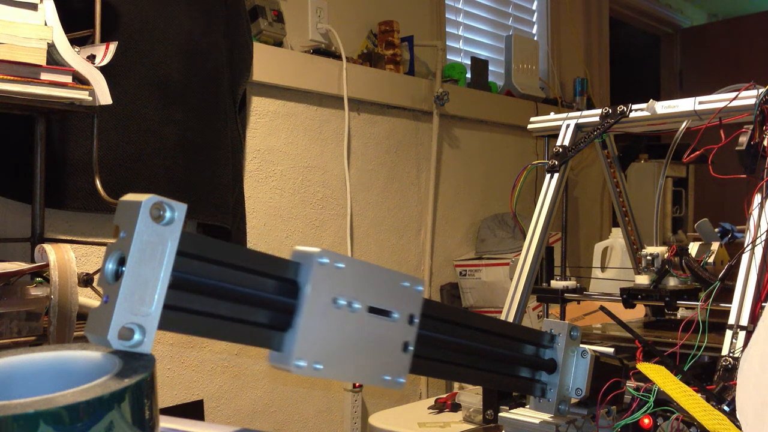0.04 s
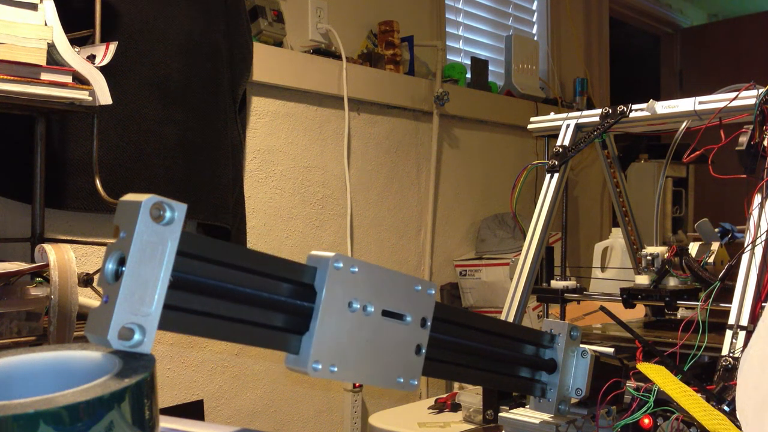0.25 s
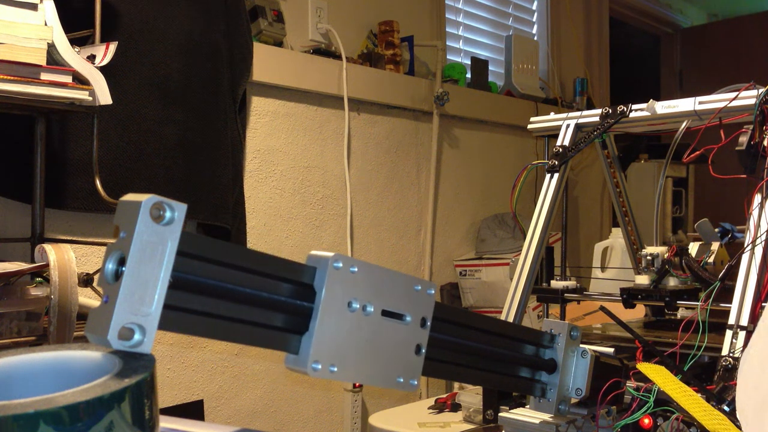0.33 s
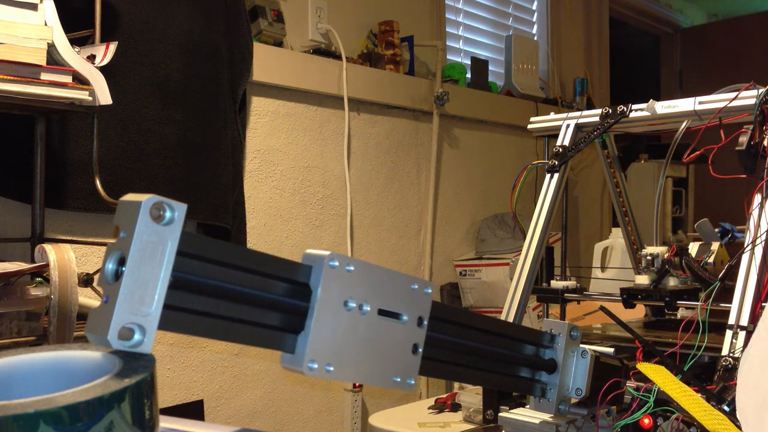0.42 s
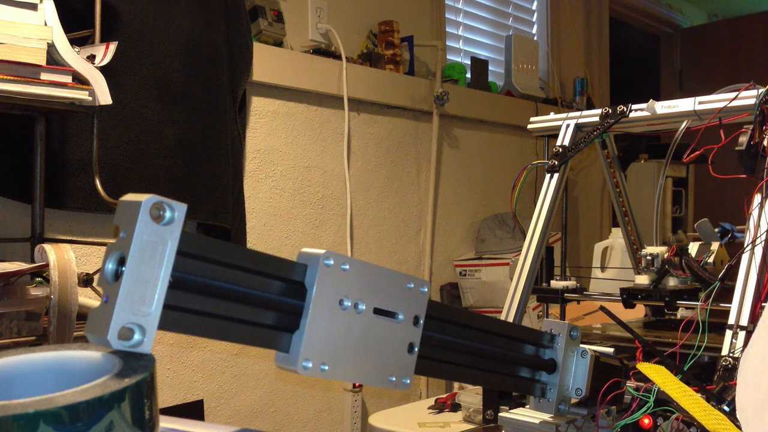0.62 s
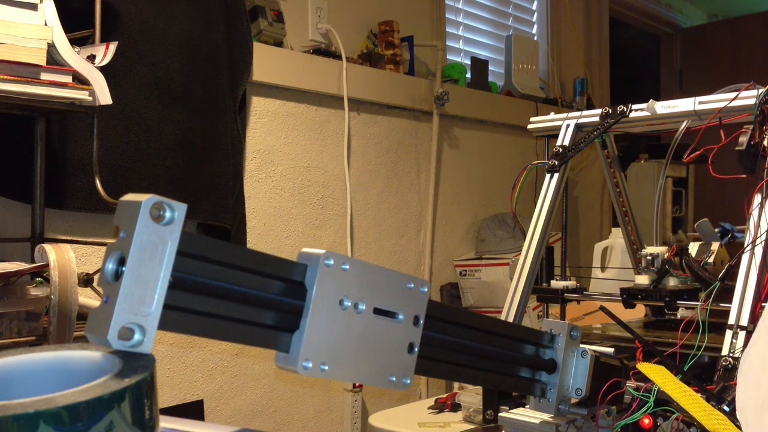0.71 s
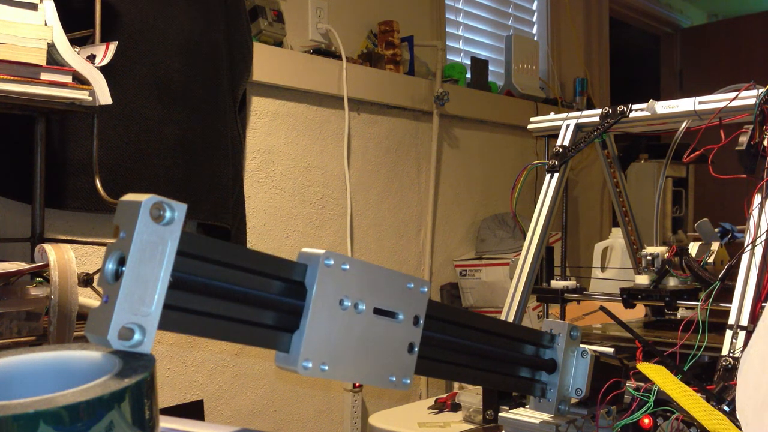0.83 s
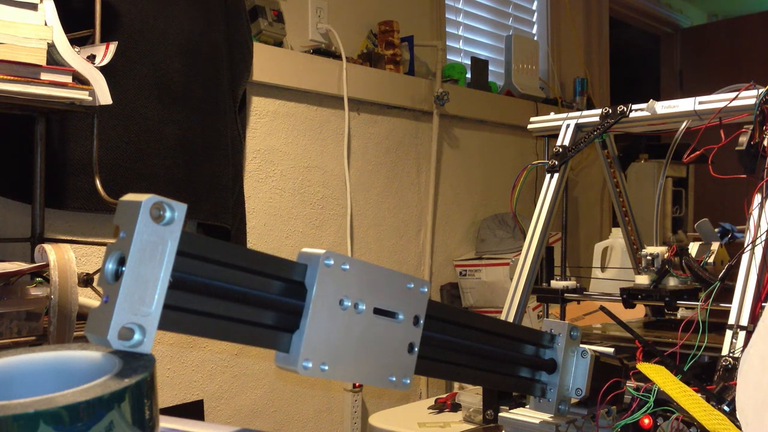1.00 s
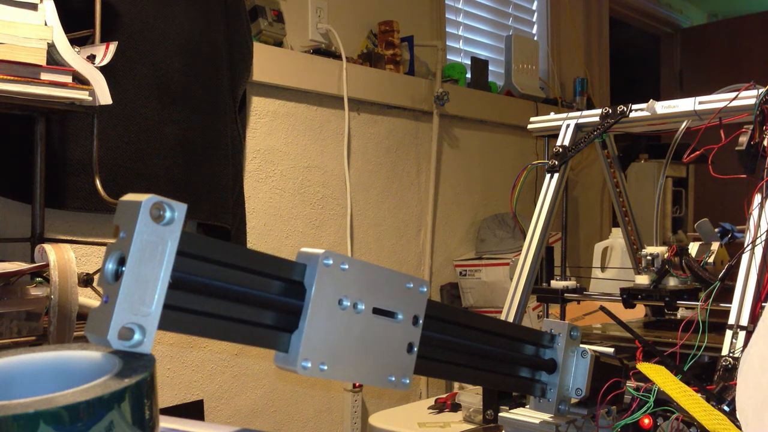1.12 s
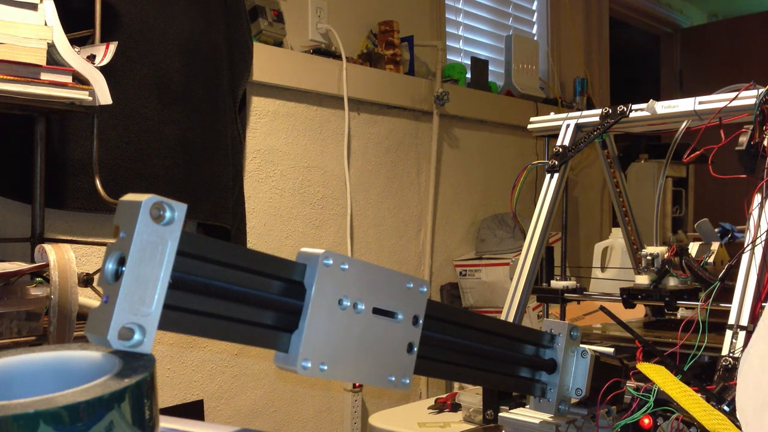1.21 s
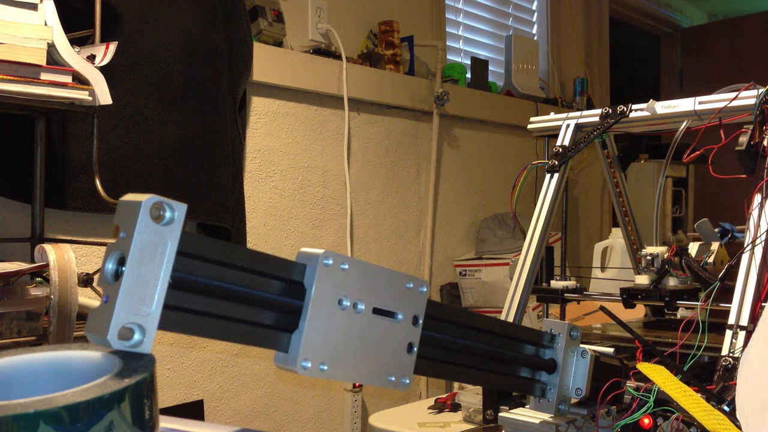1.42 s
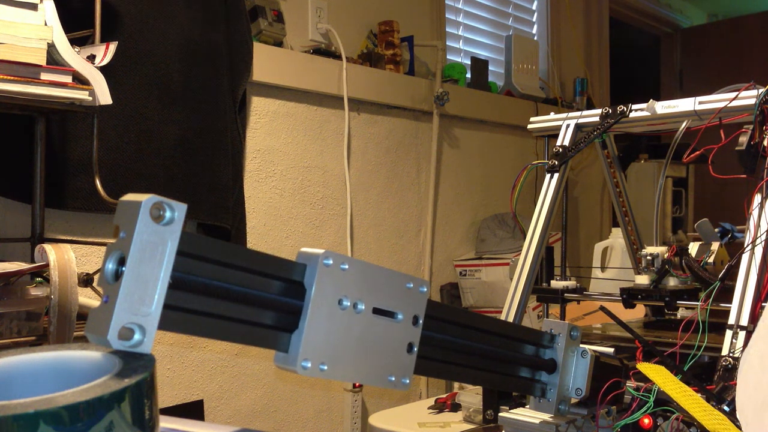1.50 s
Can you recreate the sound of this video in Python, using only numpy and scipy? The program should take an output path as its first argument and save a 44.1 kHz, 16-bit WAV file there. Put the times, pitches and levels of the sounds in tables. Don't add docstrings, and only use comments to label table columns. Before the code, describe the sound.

A stepper motor whine starts high and slides steeply down over the first 0.35 seconds, with faint screw hiss and scraping. From about 0.23 to 0.35 the carriage rattles brightly; sharp knocks, ringing chatter and low bench thuds cluster at 0.39-0.5, thinning by 0.63. Quiet hum, room hiss and a very faint high whistle follow. A soft, dull jolt lands around 1.1, then quiet. Close, dry, small room.

```python
import sys
import numpy as np
from scipy import signal
from scipy.fft import rfft, irfft
from scipy.io import wavfile
from scipy.ndimage import uniform_filter1d

SR = 44100
rng = np.random.default_rng(int(sys.argv[2]) if len(sys.argv) > 2 else 0)


def amplitude_ratio(level_db):
    exponent = np.asarray(level_db, float) / 20
    return 10 ** exponent


def master(y):
    cut = np.clip(np.atleast_2d(y).T, -1, 1)
    pcm = np.round(cut * 32767)
    wavfile.write(sys.argv[1], SR, pcm.astype(np.int16))


N = 68355
T = np.arange(N) / SR

# time_s, step_rate_hz, level_db
STEPS = [(0, 1368, -49.5), (.014, 1330, -60.5), (.044, 1220, -47.5), (.074, 1127, -52), (.087, 1079, -45),
         (.1, 1032, -54.5), (.113, 988, -75), (.14, 874.4, -47), (.16, 807.2, -54.5), (.188, 707, -52),
         (.22, 577.5, -41), (.236, 516.3, -39.5), (.252, 470.6, -41), (.276, 401.2, -47), (.3, 284, -56),
         (.311, 246.4, -60), (.331, 190.6, -50), (.379, 100, -82)]
# step_rate_multiple, level_db
WHINE_ORDERS = [(.5, -51), (1.5, -61.5), (2, -59), (2.5, -58)]
# freq_hz, gain_db
FRAME_RESPONSE = [(400, -13.5), (490, -15), (530, 5.5), (580, -17.5), (720, -11), (1300, -24), (1620, 3.5),
                  (2250, -10.5)]
# freq_hz, density_db_per_hz
RUSH_COLOUR = [(1200, -25), (2400, -6), (3300, -4), (5000, -14), (10000, -20), (14000, -31)]
# time_s, level_db
SLIDE_EFFORT = [(0, -57), (0.099, -55), (.2, -54.5), (.35, -47.5), (.42, -47.5), (0.6, -49.5), (0.649, -61),
                (.69, -100.5)]
# freq_hz, density_db_per_hz
SLIDE_COLOUR = [(90, -37), (160, 1.5), (450, -5), (1000, -11.5), (1800, -6.5), (3300, -15), (5000, -30.5),
                (10000, -44)]
# freq_hz, level_db
HUM_PARTIALS = [(119.5, -71), (239, -76.5), (359, -76.5), (480, -81), (601, -85), (5410, -87.5)]
# freq_hz, density_db_per_hz
ROOM_COLOUR = [(18, -47.5), (30, -48), (119, -8), (380, -16.5), (464, -20.5), (1300, -29), (2200, -26),
               (11500, -33), (15300, -33)]
# peak_s, level_db, pitch_hz, length_s,
# glide_hz_per_s
RINGS = [(0.068, -58.5, 2270, 0.019, -6000), (0.182, -50.5, 1624, 0.022, -300),
         (.271, -28.5, 2008, .005, -6000), (.312, -25.5, 1963, 0.0056, -1500),
         (0.332, -31.5, 2010, .008, -500), (0.3033, -41, 3540, 0.0007, -900),
         (0.307, -33.5, 3570, 0.00097, -900), (.3107, -31, 3600, 0.00077, -900),
         (0.3166, -28, 3600, 0.0011, -900), (.3197, -32, 3650, 0.00072, -900),
         (0.313, -44.5, 697, 0.019, -4000), (.394, -35.5, 1800, 0.001, -90000),
         (0.397, -44, 3500, .0012, -900), (0.4309, -35, 1800, 0.0014, -100000),
         (0.4334, -43.5, 3100, 0.0014, -900), (0.438, -36.5, 1810, 0.0021, -20000),
         (.447, -40.5, 1426, 0.0037, 5000), (.4525, -37, 1932, 0.0028, 30000),
         (0.4574, -27, 2100, 0.0025, 3000), (.458, -39, 3830, .0015, -900),
         (0.467, -30, 2130, 0.0019, -500), (0.47, -35.5, 2105, 0.012, -500),
         (0.491, -44, 2056, 0.013, -500), (0.5242, -36.5, 2020, 0.0018, -4000),
         (.530, -33.5, 1840, 0.0024, -4000), (0.546, -46.5, 414, 0.0086, -11000),
         (0.564, -51.5, 605, 0.0063, 3000), (.577, -40, 1780, 0.0027, -9000),
         (0.582, -42, 1596, 0.0055, -1500), (0.612, -42, 1970, .002, -900)]
# start_s, level_db, pitch_hz, rise_s, t60_s
THUDS = [(0.073, -61, 193, 0.013, 0.15), (0.152, -49, 157, 0.016, 0.18), (0.186, -59, 159, 0.0099, 0.11),
         (0.326, -37.5, 366.5, 0.0022, 0.038), (0.346, -39.5, 182.6, 0.0035, .1),
         (0.371, -44, 174.2, 0.0058, 0.13), (0.388, -48.5, 288, 0.0027, 0.084),
         (0.429, -38.5, 362, 0.0026, 0.044), (0.447, -38.5, 227, 0.002, 0.086),
         (.48, -38, 354, 0.0017, 0.036), (0.504, -45.5, 248, 0.0045, 0.052),
         (0.603, -36.5, 174, 0.0031, 0.092), (.625, -51.5, 342.5, 0.0036, 0.09),
         (0.641, -51.5, 164, 0.0066, 0.11), (.885, -55, 198, 0.006, 0.087), (0.952, -60, 186, 0.0067, 0.14),
         (1.110, -40.5, 163, 0.0042, 0.085), (1.159, -47, 167, 0.0037, 0.088),
         (1.195, -56, 219, 0.0014, 0.03)]
# peak_s, level_db, length_s, low_modes_db, high_modes_db
BURSTS = [(0.216, -45.5, 0.0095, -1, -8), (0.23, -39, 0.0071, 7.5, -18), (0.236, -30, 0.0066, 2, 5),
          (0.252, -37.5, 0.0046, 6, 8.5), (0.265, -33, 0.0069, -1, 3.5), (0.294, -45, 0.0057, -4, -2),
          (0.3, -49, 0.0035, -4, -7), (0.31, -27.5, 0.0075, 0, -2.5), (0.319, -30, 0.0044, 0.5, -4.5),
          (0.327, -39, 0.0083, -2, 1.5), (0.344, -43, 0.0044, -21.5, -10.5), (0.447, -34, 0.0055, 8.5, 1),
          (0.456, -25.5, 0.0052, -8, -1), (0.4673, -34, 0.0039, -14, -8), (0.481, -42, 0.013, -23, -1),
          (0.523, -37, 0.011, 0.5, -5.5), (0.542, -58, 0.0067, 1, -14), (0.583, -45, 0.0089, 6, -1.5),
          (0.608, -44.5, 0.0055, 0, -5.5), (0.622, -59, 0.0095, -12, 3), (1.121, -60, 0.0046, -4.5, 0),
          (1.15, -59.5, 0.019, 0, -1)]
# start_s, level_db, fall_s, low_modes_db, high_modes_db
KNOCKS = [
    (.3920, -28, 0.00095, 0, -5.5),
    (0.4299, -28, 0.0033, 2.5, -12),
    (0.4367, -30, 0.0022, -2, -4),
    (0.4393, -33.5, 0.0012, 0, 5.5),
    (1.07, -56, .004, 5, -3.5),
    (1.079, -58, 0.0038, 8, 3),
    (1.097, -43.5, 0.016, 4.5, -18),
    (1.135, -42, 0.0062, -0.5, -16),
]
# freq_hz, width_hz, gain_db
LOW_MODES = [(720, 140, -10.5), (1160, 81, -9), (1441, 178, -3), (1600, 245, -3.5)]
MID_MODES = [(2017, 101, 2), (2158, 62, -5), (2186, 148, -7.5), (2408, 37, -11.5)]
HIGH_MODES = [(2827, 71, -9.5), (3050, 267, -7), (3296, 102, -4.5), (3605, 184, -10.5), (3930, 228, -13),
              (5200, 3500, -38.5)]
# start_s, level_db, pitch_hz, fall_s
TAPS = [(0.232, -50, 4660, 0.017), (.231, -60.5, 7650, 0.0052), (.306, -56, 7800, 0.013),
        (.306, -53, 4500, 0.014), (0.45, -31, 838, 0.011), (.454, -56.5, 7400, 0.0082),
        (.56, -40.5, 616, 0.034), (.615, -52, 900, 0.0091), (1.070, -60, 5200, 0.0023),
        (1.081, -55, 4750, 0.002), (1.096, -39, 600, 0.0074), (1.109, -49.5, 1120, 0.01),
        (.575, -64.5, 5200, 0.044), (1.112, -49, 720, 0.045), (1.135, -45, 440, .02),
        (1.137, -51, 930, 0.026)]

STEP_JITTER = 0.0028
STOP_S, ROUGH_FROM_S = 0.323, 0.28
GRIT_DB, ROUGH_DB = -13, -3.5
STEP_SPREAD_DB, CLATTER_SPREAD_DB, CLATTER_PER_S = 2.5, 1.5, 1600
BLOW_DB, STRIKE_GAIN_DB = 18, 13.5
WHISTLE_HZ, WHISTLE_DB, WHISTLE_ON_S, WHISTLE_OFF_S = 11789, -72, 0.635, 1.105
ROOM_DB, ROOM_T60_S, ROOM_WET_DB = -62.5, 0.13, -9.5


def level(x, db):
    return x * amplitude_ratio(db) / np.sqrt(np.mean(x ** 2))


def ring(x, hz, width_hz):
    return signal.lfilter(*signal.iirpeak(hz, hz / width_hz, fs=SR), x)


def walk(rate_hz):
    k = int(SR / rate_hz)
    held = np.repeat(rng.standard_normal(N // k + 1), k)
    smooth = uniform_filter1d(uniform_filter1d(held, k), k)
    return level(smooth[:N], 0)


def coloured(points):
    hz, db = np.array(points, float).T
    f = np.maximum(np.arange(N // 2 + 1) * SR / N, 1)
    gain = amplitude_ratio(np.interp(np.log(f), np.log(hz), db))
    return level(irfft(rfft(rng.standard_normal(N)) * gain, N), 0)


def clicks(turns, size):
    at = np.interp(np.arange(1, int(turns[-1])), turns, np.arange(N))
    i = np.minimum(at.astype(int), N - 2)
    size = size[:len(i)]
    out = np.zeros(N)
    np.add.at(out, i, size * (1 - at % 1))
    np.add.at(out, i + 1, size * (at % 1))
    return out


def step_turns():
    s, hz, _ = np.array(STEPS).T
    return np.cumsum(np.interp(T, s, hz) * (1 + STEP_JITTER * walk(150.1))) / SR


def whine(turns):
    s, hz, db = np.array(STEPS).T
    step_hz = np.interp(T, s, hz)
    out = amplitude_ratio(np.interp(T, s, db, right=-120) + 2.5 * walk(119.1)) * np.sin(2 * np.pi * turns)
    frame_hz, gain_db = np.array(FRAME_RESPONSE).T
    fade_db = 60 * np.clip((T - .2) / 0.032, 0, 1)
    for m, order_db in WHINE_ORDERS:
        answer_db = np.interp(m * step_hz, frame_hz, gain_db, right=-30) - fade_db
        out = out + amplitude_ratio(order_db + answer_db + 4 * walk(104)) * np.sin(2 * np.pi * m * turns)
    return np.sqrt(2) * out


def slide():
    s, db = np.array(SLIDE_EFFORT).T
    return amplitude_ratio(np.interp(T, s, db, right=-120) + 2 * walk(58.8)) * coloured(SLIDE_COLOUR)


def screw_rush():
    return amplitude_ratio(-60.5 - 50 * T + 0.95 * walk(90)) * coloured(RUSH_COLOUR)


def mains_hum():
    out = 0
    for k, (hz, db) in enumerate(HUM_PARTIALS):
        out = out + amplitude_ratio(db + 1.5 * T + 0.91 * walk(9.55)) * np.sin(2 * np.pi * hz * T + k)
    return np.sqrt(2) * out


def room_hiss():
    return amplitude_ratio(ROOM_DB + 0.805 * walk(5.23)) * coloured(ROOM_COLOUR)


def room_tail(near):
    t = T[:N // 4]
    tail = rng.standard_normal(N // 4) * amplitude_ratio(-60 * t / ROOM_T60_S) * (t > .004)
    return signal.fftconvolve(near, tail / np.sqrt(np.sum(tail ** 2)))[:N]


def tone_rings():
    flutter, out = amplitude_ratio(1.5 * walk(300)), 0
    for s, db, hz, length, glide in RINGS:
        t = T - s
        u = np.clip(t, -3 * length, 3 * length)
        turns = hz * t + glide * u ** 2 / 2
        out = out + amplitude_ratio(db) * np.exp(-(t / length) ** 2) * np.sin(2 * np.pi * turns)
    return np.sqrt(2) * flutter * out


def thuds():
    out = 0
    for s, db, hz, rise, t60 in THUDS:
        u = np.maximum(T - s, 0)
        turns = hz * u * (1 - 0.087 * np.minimum(u / t60, 1))
        out = out + 2 * amplitude_ratio(db - 60 * u / t60) * (1 - np.exp(-u / rise)) * np.sin(2 * np.pi * turns)
    return signal.sosfilt(signal.butter(4, 126, "high", fs=SR, output="sos"), out)


def rattle(turns):
    steps = clicks(turns, amplitude_ratio(STEP_SPREAD_DB * rng.standard_normal(N)))
    loose_turns = np.cumsum(CLATTER_PER_S * amplitude_ratio(3 * walk(400))) / SR
    loose_size = amplitude_ratio(CLATTER_SPREAD_DB * rng.standard_normal(N)) * rng.choice([-1, 1], N)
    loose = clicks(loose_turns, loose_size)
    grit = rng.standard_normal(N)
    strikes = np.where(T < STOP_S, level(steps, 0), level(loose, 0))
    strikes = strikes + amplitude_ratio(np.where(T < ROUGH_FROM_S, GRIT_DB, ROUGH_DB)) * grit

    force = np.zeros((3, N))
    for s, db, length, low_db, high_db in BURSTS:
        gain = amplitude_ratio(db + np.array([[low_db], [0], [high_db]]))
        force = force + gain * np.exp(-((T - s) / length) ** 2) * strikes
    for s, db, fall, low_db, high_db in KNOCKS:
        gain = amplitude_ratio(db + np.array([[low_db], [0], [high_db]]))
        decay = (T >= s) * np.exp(-np.abs(T - s) / fall)
        blow = np.abs(T - s - 1 / SR) < .5 / SR
        force = force + gain * decay * (grit + amplitude_ratio(BLOW_DB) * blow)

    body = 0
    for push, modes in zip(force, (LOW_MODES, MID_MODES, HIGH_MODES)):
        for k, (hz, width_hz, db) in enumerate(modes):
            body = body + (-1) ** k * amplitude_ratio(db) * ring(push, hz, width_hz)
    body = body - 0.27 * ring(body, 2880, 298)
    band = signal.butter(2, [1000, 6500], "band", fs=SR, output="sos")
    return amplitude_ratio(STRIKE_GAIN_DB) * (signal.sosfilt(band, body) + bench_taps(grit))


def bench_taps(grit):
    out = 0
    for s, db, hz, fall in TAPS:
        tap = amplitude_ratio(db) * (T >= s) * np.exp(-np.abs(T - s) / fall) * grit
        out = out + ring(ring(tap, hz, 0.19 * hz), hz, hz)
    return out


def holding_whistle():
    on = np.clip(np.minimum(T - WHISTLE_ON_S, WHISTLE_OFF_S - T) / 0.008 + .5, 0, 1)
    return np.sqrt(2) * amplitude_ratio(WHISTLE_DB + 0.35 * walk(20.6)) * on * np.sin(2 * np.pi * WHISTLE_HZ * T)


def scene():
    turns = step_turns()
    near = whine(turns) + rattle(turns) + thuds() + slide() + tone_rings() + screw_rush()
    wet = amplitude_ratio(ROOM_WET_DB) * room_tail(near)
    electrical = mains_hum() + holding_whistle()
    return (near + wet + electrical + room_hiss())[None]


def band_limit(x):
    return signal.sosfilt(signal.butter(12, 15420, fs=SR, output="sos"), x)


def record(dry):
    mix = signal.sosfilt(signal.butter(1, 15, "high", fs=SR, output="sos"), dry)
    mix = signal.sosfilt(signal.ellip(10, .2, 60, 15400, fs=SR, output="sos"), mix)
    return band_limit(mix)


dry = scene()
out = record(dry)
master(out)
```